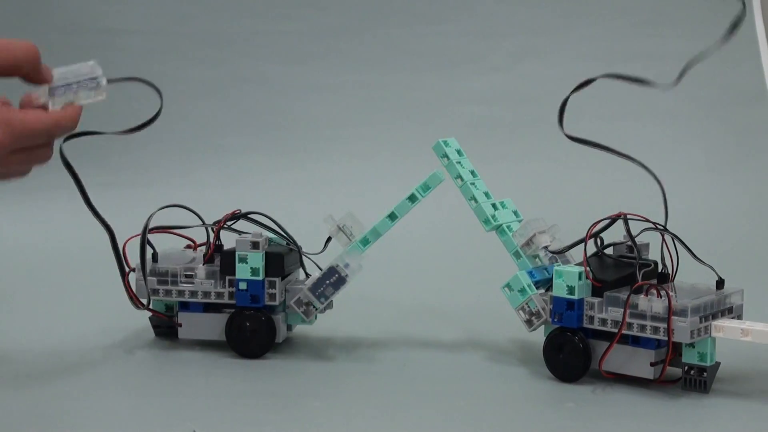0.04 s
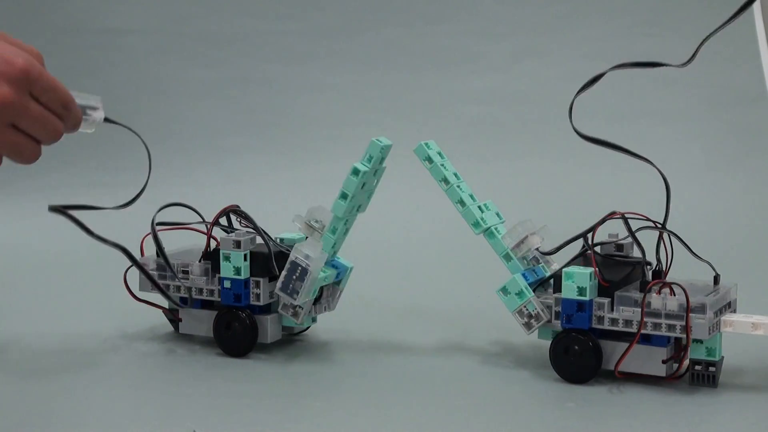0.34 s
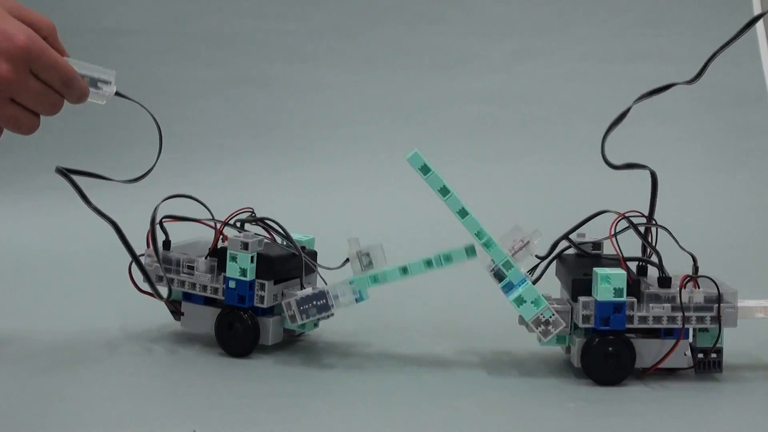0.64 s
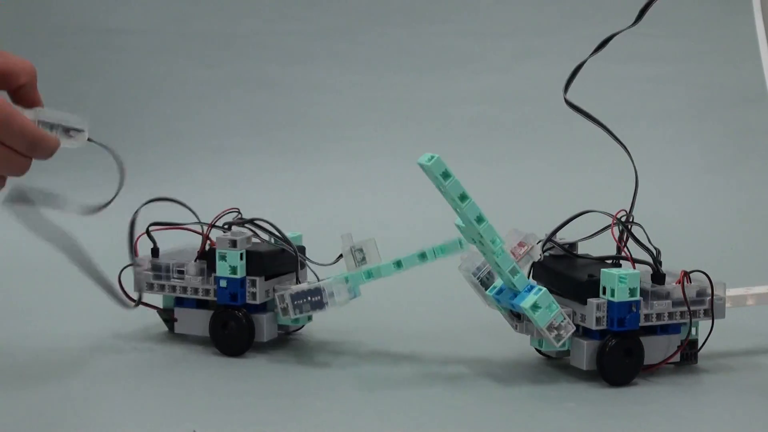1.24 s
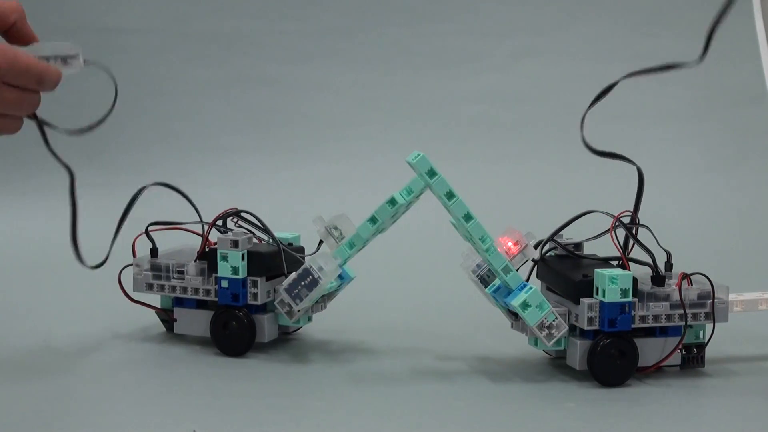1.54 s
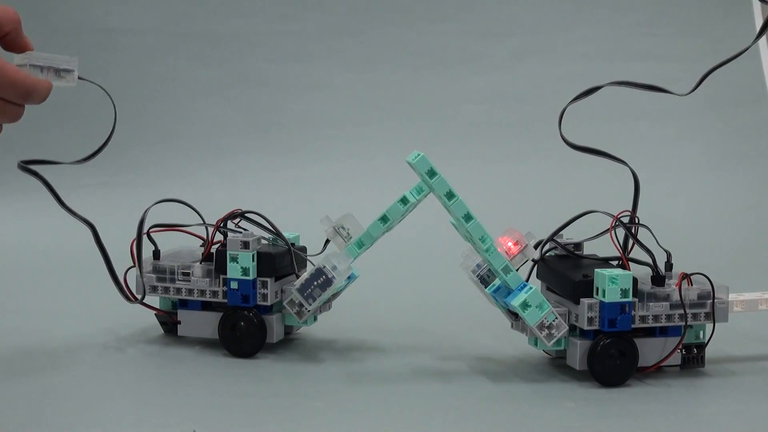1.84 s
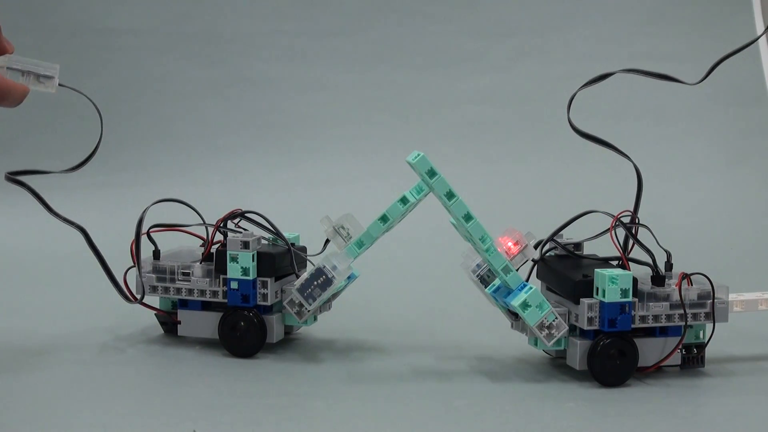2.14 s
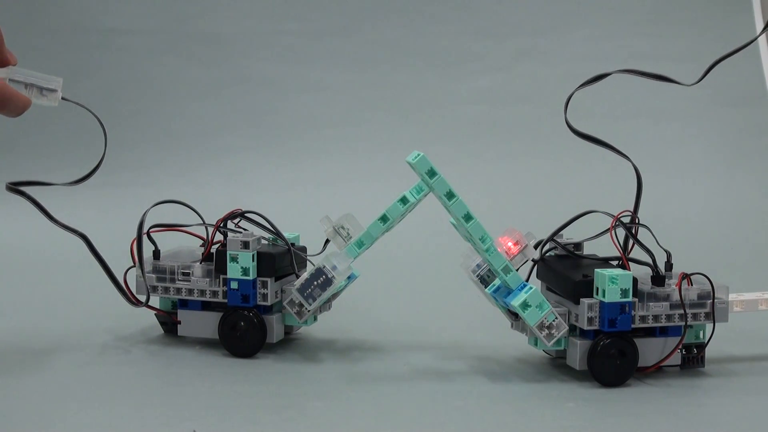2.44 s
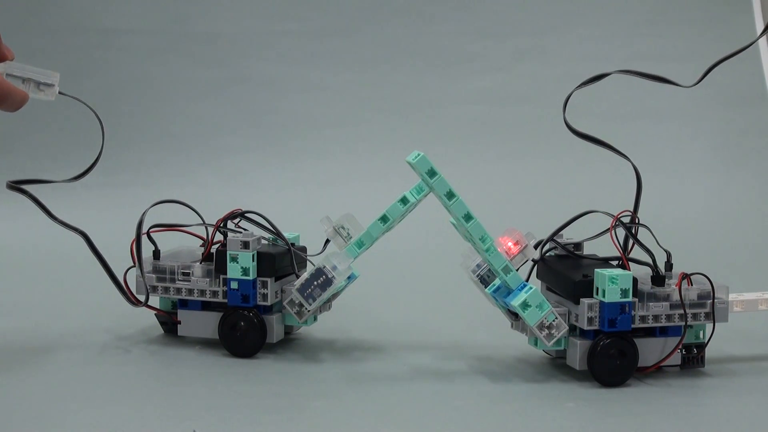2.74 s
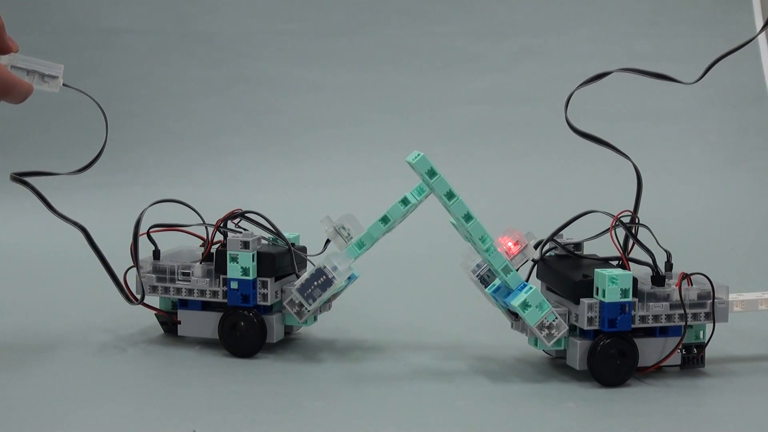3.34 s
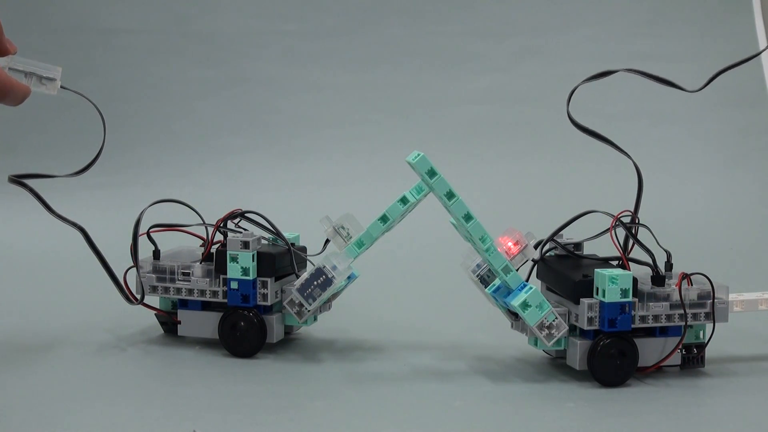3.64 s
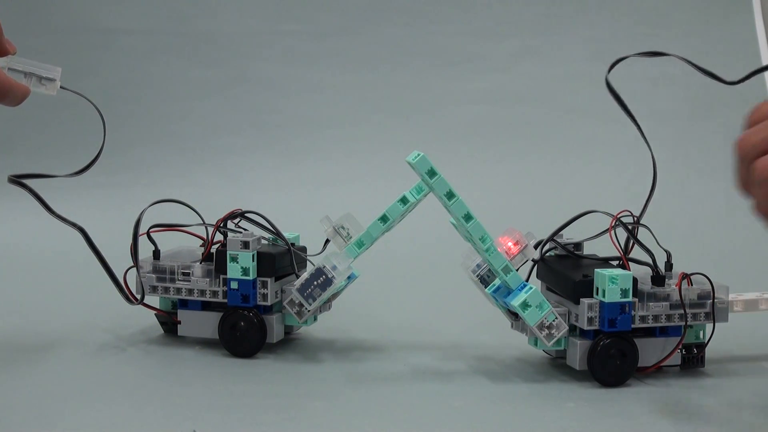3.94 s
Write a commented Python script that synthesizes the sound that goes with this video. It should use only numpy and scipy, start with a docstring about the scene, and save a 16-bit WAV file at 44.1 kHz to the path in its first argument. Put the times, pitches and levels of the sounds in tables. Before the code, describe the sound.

Whirring, ticking gears of two wrestling toy robots, with one plastic knock before they stop.

```python
"""Servo gears whir, tick and squeak as two toy robots of plastic bricks wrestle on a table in a live room.
The wheel motor hums and the wheels bump; one robot rears up and falls back with a clattering knock
that shakes the table and makes the bricks crack. The motors stop, leaving faint servo twitches,
soft rubbing and a dull, distant thud over the room's air."""
import sys
import numpy as np
from scipy import signal
from scipy.fft import rfft, irfft, next_fast_len
from scipy.io import wavfile
from scipy.ndimage import map_coordinates

SR = 44100
rng = np.random.default_rng(int(sys.argv[2]) if len(sys.argv) > 2 else 0)


def put_to_file(sound):
    """Save the sound as 16-bit audio at rate SR, in the file named by the first command-line argument."""
    columns = np.atleast_2d(sound).T  # one column per channel
    safe = np.clip(columns, -1, 1)
    whole_steps = np.round(safe * 32767)
    wavfile.write(sys.argv[1], SR, whole_steps.astype(np.int16))


N = 4 * SR


def servos():
    """Gear teeth clatter in their plastic cases, swaying with the shaft; the motor whines above."""
    # swell of the whir: time_s, level_db
    effort = [(0, -22), (.14, -23.5), (.2, -25), (.27, -32), (.39, -36.5), (.46, -32.5), (.63, -30),
              (.78, -28.5), (.9, -29), (.98, -30), (1.05, -40), (1.14, -34.5), (1.19, -31.5), (1.33, -31),
              (1.42, -33.5), (1.48, -44.5), (1.52, -35), (1.62, -35), (1.72, -33.5), (1.77, -39.5),
              (1.81, -52), (1.9, -65)]
    # tone of the gear train: freq_hz, level_db
    gear_colour = [(200, -23), (420, -20.5), (618, -13.5), (1000, -16), (1450, -5), (2200, -3),
                   (2860, -4.5), (4260, -4), (5930, -2.5), (6700, -7), (11900, -13.5), (16000, -31)]
    # gearbox resonances: centre_hz, width_hz
    case_modes = [(1785, 290), (2910, 190), (3700, 660)]
    # their mix shifts as the arms swing and take the load: time_s, then level_db of each of the three
    case_levels = [(.15, -15.5, -12, -13), (.5, -31, -17, -9), (.9, -35, -22, -11),
                   (1.5, -21, -15.5, -29.5)]
    # fader of the motor's narrow whine: time_s, level_db
    whine_levels = [(0, -31.5), (.4, -43), (.7, -40), (1.1, -42.5), (1.19, -100)]
    shaft_hz, sway_db = 91.3, 1.3
    whine_hz, whine_width_hz = 5900, 300
    shaft_angle = phase(shaft_hz * (1 + 0.068 * wobble(23)))
    sway = amp(sway_db * np.sin(shaft_angle))
    rasp = sum(amp(db) * resonate(sway * teeth(), [(hz, width, 0)])
               for (hz, width), db in zip(case_modes, curves(case_levels)))
    whir = amp(-1.96) * coloured(sway * teeth(), gear_colour) + rasp
    whine = resonate(white(), [(whine_hz, whine_width_hz, 0)])
    return amp(curves(effort)[0]) * whir + amp(curves(whine_levels)[0]) * whine


def teeth(contacts_per_s=3000, scatter_db=3):
    """Uneven tooth contacts over a little sliding noise."""
    clicks = (rng.random(N) < contacts_per_s / SR) * np.sign(white())
    force = amp(scatter_db * np.clip(white(), -2, 2))
    return unit(unit(clicks * force) + amp(-6) * white())


def ticks():
    """Gears snap against their load in short bursts of backlash, up to about fifty a second."""
    # gear snaps: start_s, level_db
    snaps = [(.112, -12), (.134, -12), (.156, -14), (.188, -12), (.216, -14), (.444, -17), (.504, -17),
             (.665, -15), (.686, -15), (.707, -13), (.728, -14), (.748, -15), (.788, -16), (.829, -13),
             (.849, -15), (.868, -12), (.888, -13), (1.514, -15), (1.542, -20), (1.566, -16.5), (1.62, -19),
             (1.643, -19), (1.6635, -15), (1.683, -15), (1.6995, -17), (1.72, -18), (1.746, -18)]
    # their bright tone: freq_hz, level_db
    snap_colour = [(1200, -11.5), (2750, 4.5), (3800, 1.5), (5500, 1.5), (12000, -9), (16000, -28)]
    bursts = sum(amp(db - 2) * strike(s, rise_s=.001, t60_s=.017) for s, db in snaps)
    return bursts * coloured(white(), snap_colour)


def knock():
    """The chassis lands: each contact shakes table and chassis and makes the bricks crack."""
    # contacts with the table: start_s, body_db, crack_db
    contacts = [(1.275, -14.5, -42), (1.2935, -23.5, -33), (1.3044, -21.5, -19), (1.323, -32, -22.5)]
    # hollow tone of table and chassis: freq_hz, level_db
    body_colour = [(30, -42), (60, -11), (110, -8.5), (180, 5), (290, -0.5), (420, -0.5), (637, -4.5),
                   (862, -2), (1000, -9), (1450, -11), (2130, -6.5), (2570, -7.5), (2900, -15),
                   (5000, -19.5), (7500, -55)]
    # hard edge of the bricks: freq_hz, level_db
    crack_colour = [(300, -18), (2000, -1.5), (4500, -9), (8000, -2), (12000, -9), (16000, -30)]
    body = sum(amp(db) * strike(s, rise_s=.00049, t60_s=.11) for s, db, _ in contacts)
    crack = sum(amp(db) * strike(s, rise_s=.0004, t60_s=.03) for s, _, db in contacts)
    return body * coloured(white(), body_colour) + crack * coloured(white(), crack_colour)


def squeaks(jitter=.025):
    """Plastic arms slide on each other with thin, unsteady squeaks, most of them sagging in pitch."""
    # slides: start_s, length_s, level_db, pitch_hz, glide_hz_per_s
    slides = [(.737, .011, -32, 9100, 0), (1.17, .04, -38.5, 8550, -6000), (1.322, .04, -37, 7750, -6000),
              (1.368, .032, -37, 10000, -7500)]
    out = np.zeros(N)
    for s, length, db, hz, glide in slides:
        pitch = hz * (1 + jitter * wobble(1700)) + glide * np.clip(clock() - s, 0, length)
        out += amp(db) * gate(s, length, attack_s=.0065, release_s=.006) * np.sin(phase(pitch))
    return out


def bumps():
    """Rubber wheels bump the table, each time with a low note in a soft thump."""
    # wheel bumps: start_s, level_db, pitch_hz
    hits = [(0.293, -39.5, 158.5), (1.093, -33, 138.4), (1.488, -35.5, 176), (2.554, -42, 224)]
    # muffled tone of the thump: freq_hz, level_db
    thump_colour = [(40, -23), (130, -6.5), (300, -9), (650, -17.5), (1500, -32), (6000, -67)]
    thump = coloured(white(), thump_colour)
    out = np.zeros(N)
    for s, db, hz in hits:
        note = amp(-3) * np.sin(2 * np.pi * hz * (clock() - s))
        out += amp(db) * strike(s, rise_s=.004, t60_s=.13) * (note + thump)
    return out


def drive():
    """The wheel motor hums upward as it gathers speed."""
    # the motor's run: time_s, pitch_hz, level_db
    run = [(.42, 125, -66), (.49, 135.2, -58), (.58, 165.6, -58), (.66, 181, -50), (.72, 189.3, -64),
           (.9, 213.7, -57), (.99, 206.3, -88)]
    # partials of the hum: harmonic_number, level_db
    harmonics = [(1, 4.5), (2, -8), (3, -4), (4, -7)]
    hz, db = curves(run)
    turn = phase(hz * (1 + 0.0063 * wobble(38.7)))
    return amp(db) * sum(amp(level) * np.sin(k * turn) for k, level in harmonics)


def twitches(grain_db=3):
    """Servos holding their place give faint, short, scratchy buzzes."""
    # buzzes: start_s, length_s, level_db
    buzzes = [(2.043, .014, -56.5), (2.114, 0.11, -53.5), (2.305, 0.048, -55.5), (2.38, 0.039, -57.5),
              (3.368, 0.023, -57), (3.409, 0.025, -56.5), (3.444, 0.067, -56)]
    # their resonances: centre_hz, width_hz, level_db
    modes = [(2016, 600, -2.5), (2540, 920, 3)]
    grain = amp(grain_db * wobble(150))
    bursts = sum(amp(db) * gate(s, length, attack_s=.001, release_s=.006) for s, length, db in buzzes)
    return grain * bursts * resonate(white(), modes)


def rubs(grain_db=1.5):
    """Soft, grainy rubbing, like cables sliding."""
    # strokes: start_s, length_s, level_db, centre_hz, width_octaves
    strokes = [(2.067, 0.32, -66, 4730, 0.74), (2.487, 0.2, -56.5, 2800, 0.83),
               (2.57, 0.036, -49.5, 6600, 0.53), (3.403, 0.07, -57.5, 4370, 0.76),
               (3.578, .43, -58, 1280, 1.9), (3.584, 0.087, -61, 11500, 0.15),
               (3.792, 0.052, -53.5, 4000, 1.3)]
    friction = sum(amp(db) * gate(s, length, attack_s=.0061, release_s=.014) * band(hz, octaves)
                   for s, length, db, hz, octaves in strokes)
    return friction * amp(grain_db * wobble(120))


def thud():
    """A distant, rustling thud whose bass comes late and lingers."""
    # noise layers of the thud: start_s, level_db, centre_hz, width_octaves, rise_s, t60_s
    layers = [(2.664, -39, 2140, 0.77, 0.01, 0.65), (2.65, -43, 810, 0.22, 0.013, 0.52),
              (2.673, -37.5, 180, 0.81, 0.0039, .58), (2.8, -46, 177, 0.83, 0.019, .8),
              (2.76, -47.5, 70, 0.67, .025, 1.64), (2.666, -51.5, 5200, 0.12, .006, 0.92),
              (2.668, -49, 8100, 0.32, .008, 0.25)]
    return sum(amp(db) * strike(s, rise, t60) * band(hz, octaves)
               for s, db, hz, octaves, rise, t60 in layers)


def off_centre(pair):
    """An impact off centre reaches left and right with a different level and phase."""
    # level tilt: freq_hz, left_minus_right_db
    balance = [(60, 2.5), (240, -1.5), (3800, 0)]
    # phase offset: freq_hz, left_lead_rad
    lead = [(60, 0.27), (500, -0.54), (3200, -0.38)]
    sides = np.array([[.5], [-.5]])
    return filtered(pair, lambda f: amp(sides * along(balance, f)) * np.exp(1j * sides * along(lead, f)))


def room(dry, wet_db, step_s=.2, build_s=.0057):
    """Direct sound in the middle and a wide, dying tail that changes as things move."""
    # reverb time: freq_hz, t60_s
    decay_times = [(100, 0.46), (500, 0.72), (2000, 0.79), (5000, 0.57), (12000, 0.45)]
    # stereo width of the tail: freq_hz, side_db
    tail_width = [(60, -25), (200, -15), (500, -9.5), (1200, -5.5), (4000, -8), (9000, -5), (12000, -11.5)]
    step = int(step_s * SR)
    hz, t = np.fft.rfftfreq(256, 1 / SR), np.arange(0, SR, 128) / SR
    decay = amp(-60 * t / along(decay_times, hz)[:, None]) * (1 - np.exp(-t / build_s))
    padded = np.pad(dry, (step, 2 * step))
    fade = signal.windows.cosine(2 * step)
    wet = np.zeros((2, N + 2 * SR))
    for i in range(0, N + step, step):  # each overlapping slice gets a fresh random tail
        random_phase = np.exp(2j * np.pi * rng.random((2, *decay.shape)))
        tail = signal.istft(decay * random_phase)[1]
        tail /= np.linalg.norm(tail, axis=1, keepdims=True)
        send = padded[i:i + 2 * step] * fade
        echo = signal.fftconvolve(send[None], tail, axes=1)
        wet[:, i:i + echo.shape[1]] += echo
    mid, side = amp(wet_db) * wet[:, step:step + N]
    return stereo(dry + mid, side, tail_width) / np.sqrt(1 + amp(wet_db) ** 2)


def air(air_db=-58, fan_db=-67.5, fan_hz=445.5):
    """Steady room air with a faint ventilation tone."""
    # room tone: freq_hz, level_db
    air_colour = [(15, -55), (25, -6), (76, -6.5), (161, -9), (223, -6), (344, -12), (480, -10), (800, -11),
                  (2410, -21), (3400, -27), (9500, -34.5), (15000, -28)]
    # its stereo width: freq_hz, side_db
    air_width = [(60, -29), (250, -13.5), (600, -8), (3000, 3), (13000, -12)]
    mid, side = [amp(air_db) * coloured(white(), air_colour)
                 + amp(fan_db) * resonate(white(), [(fan_hz, 40, 0)]) for _ in range(2)]
    return stereo(mid, side, air_width)


def amp(db):
    """Decibels to gain."""
    return 10 ** (np.asarray(db) / 20)


def unit(x):
    """Scale to rms 1."""
    return x / np.sqrt(np.mean(x ** 2) + 1e-20)


def clock():
    """Time of each sample in seconds."""
    return np.arange(N) / SR


def phase(hz):
    """Running angle in radians of a moving pitch."""
    return 2 * np.pi * np.cumsum(hz) / SR


def along(points, hz):
    """Read (freq_hz, value) points at hz, on a log frequency axis."""
    freqs, values = np.transpose(points)
    return np.interp(np.log(hz + 1), np.log(freqs + 1), values)


def curves(rows):
    """An automation curve for each column after the time."""
    times, *columns = np.transpose(rows)
    return [np.interp(clock(), times, column) for column in columns]


def wobble(knots_per_s):
    """A smooth random curve."""
    return map_coordinates(rng.standard_normal(N // 20), [clock() * knots_per_s], mode="wrap")


def strike(start_s, rise_s, t60_s):
    """Envelope of a blow: quick rise, exponential decay."""
    out = np.zeros(N)
    start = int(start_s * SR)
    t = clock()[:min(N - start, int(2 * t60_s * SR))]
    out[start:start + len(t)] = (1 - np.exp(-t / rise_s)) * amp(-60 * t / t60_s)
    return out


def gate(start_s, length_s, attack_s, release_s):
    """Envelope with attack, hold and release."""
    t = clock() - start_s
    return np.clip(t / attack_s, 0, 1) * np.exp(-np.maximum(t - length_s, 0) / release_s)


def white():
    """Fresh white noise."""
    return rng.standard_normal(N)


def filtered(x, response):
    """Shape the spectrum of x with a function of frequency."""
    size = next_fast_len(N + SR // 4)
    return irfft(rfft(x, size) * response(np.fft.rfftfreq(size, 1 / SR)), size)[..., :N]


def coloured(x, points):
    """x through a (freq_hz, level_db) EQ curve, at rms 1."""
    return unit(filtered(x, lambda f: amp(along(points, f))))


def band(hz, octaves):
    """Noise in a bell around hz, at rms 1."""
    return unit(filtered(white(), lambda f: 1 / (1 + (np.log2((f + 1) / hz) / octaves) ** 2 / 4) ** 2))


def resonate(x, modes):
    """x through parallel (centre_hz, width_hz, level_db) band-passes, each applied twice, at rms 1."""
    def response(f):
        return sum(amp(db) * (1j * f * width / (hz * hz - f * f + 1j * f * width)) ** 2
                   for hz, width, db in modes)
    return unit(filtered(x, response))


def stereo(mid, side, width):
    """Left and right from mid and side, with a (freq_hz, side_db) EQ on the side."""
    side = filtered(side, lambda f: amp(along(width, f)))
    return np.array([mid + side, mid - side])


def scene():
    """Robots, impacts and faint sounds share one room, the faint ones wettest."""
    robots = room(servos() + ticks() + drive() + squeaks() + twitches(), wet_db=-4.5)
    impacts = off_centre(room(knock() + bumps(), wet_db=-3.5))
    faint = room(rubs() + thud(), wet_db=-1.5)
    return robots + impacts + faint + air()


def record(dry):
    """A brick-wall low-pass trims the very top."""
    return filtered(dry, lambda hz: hz < 16500)


dry = scene()
out = record(dry)
put_to_file(out)
```